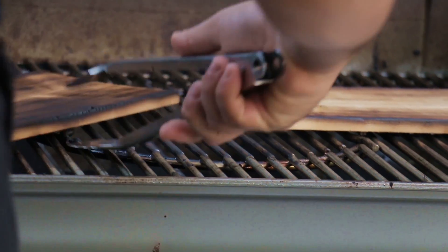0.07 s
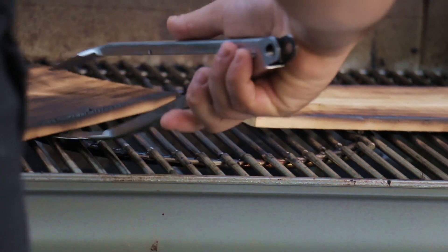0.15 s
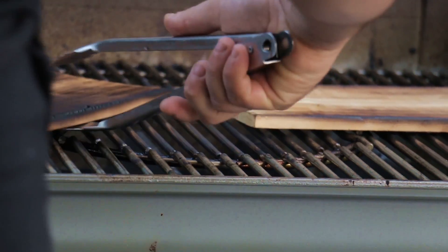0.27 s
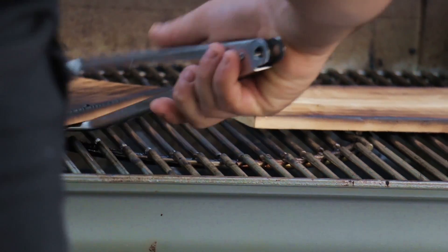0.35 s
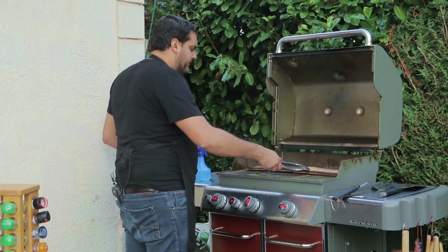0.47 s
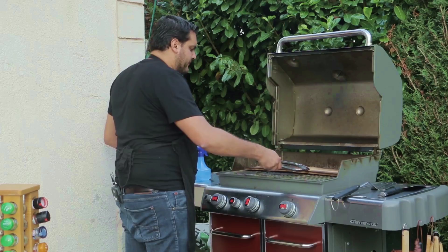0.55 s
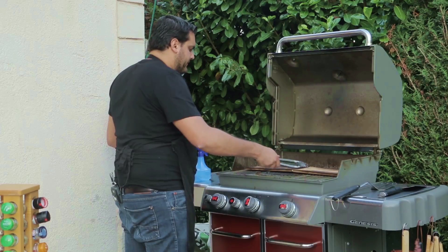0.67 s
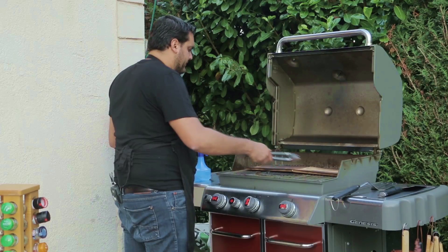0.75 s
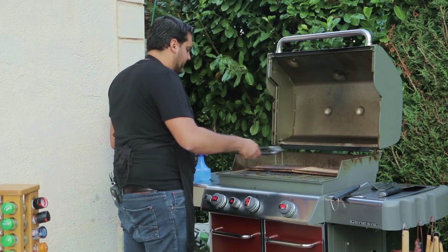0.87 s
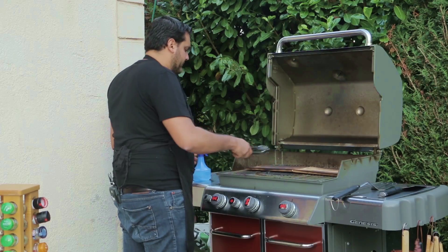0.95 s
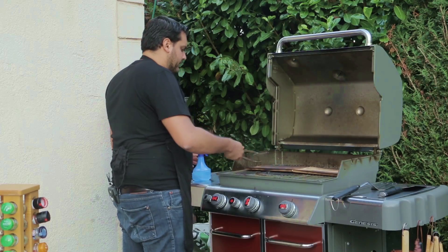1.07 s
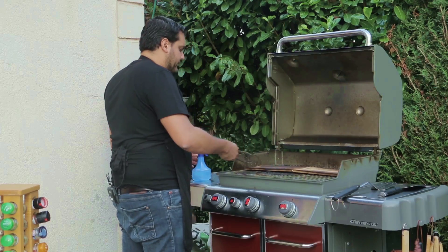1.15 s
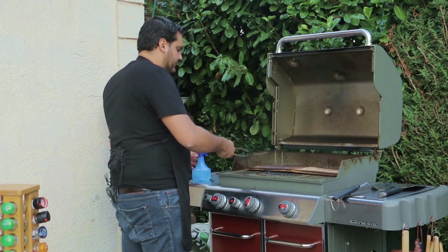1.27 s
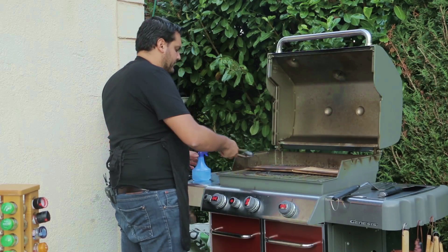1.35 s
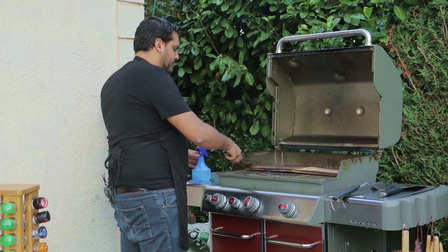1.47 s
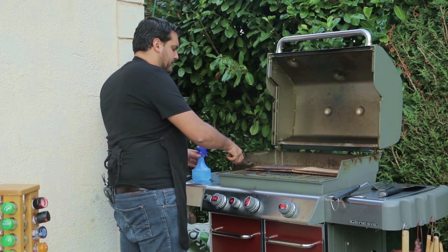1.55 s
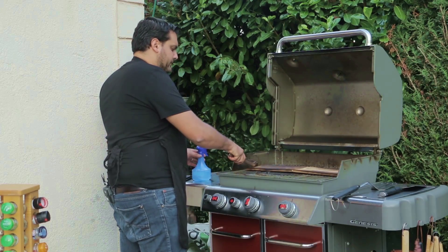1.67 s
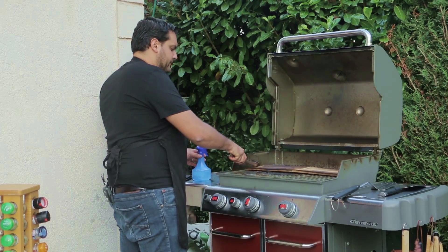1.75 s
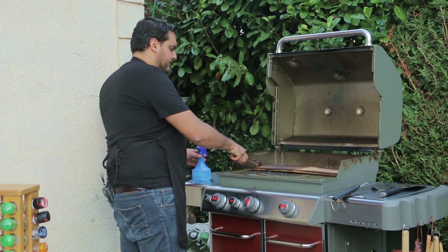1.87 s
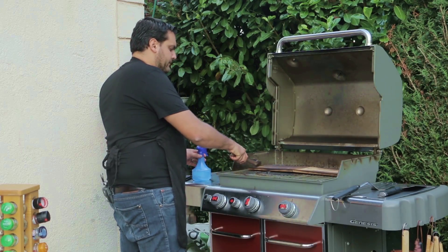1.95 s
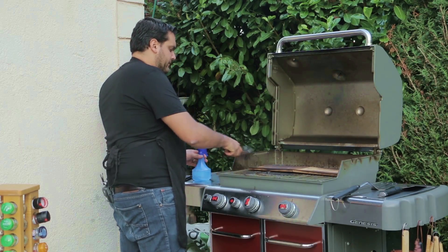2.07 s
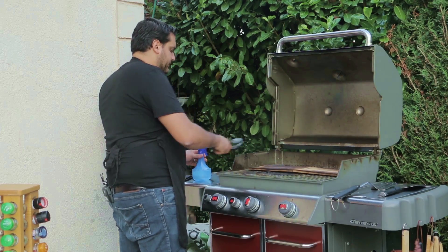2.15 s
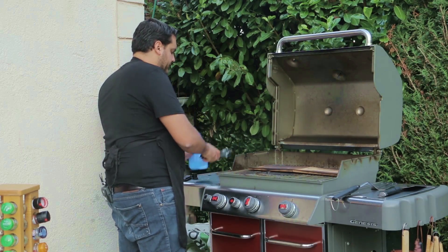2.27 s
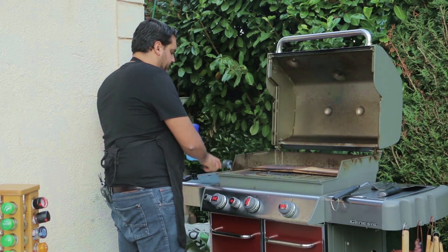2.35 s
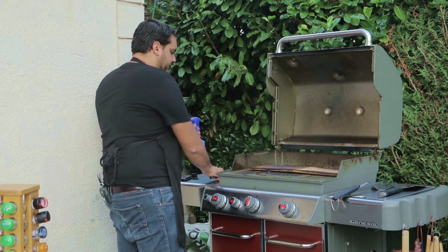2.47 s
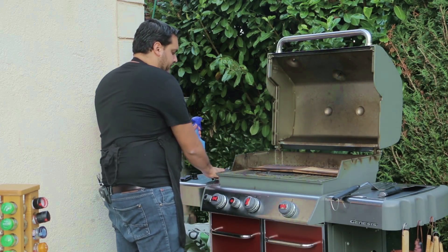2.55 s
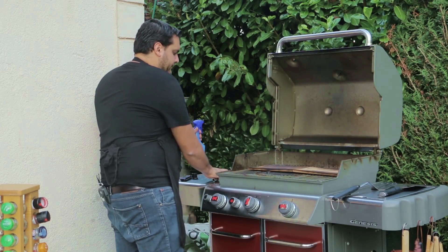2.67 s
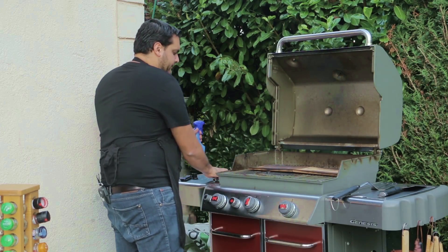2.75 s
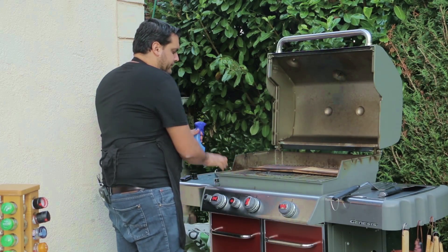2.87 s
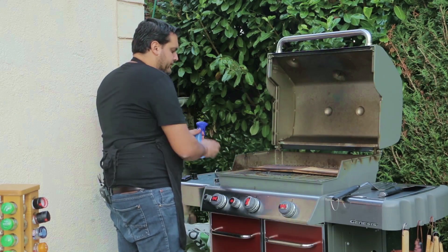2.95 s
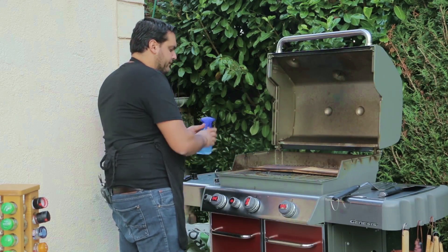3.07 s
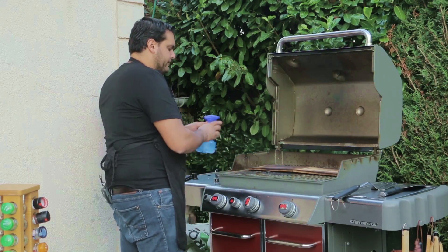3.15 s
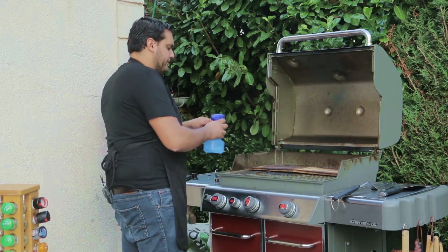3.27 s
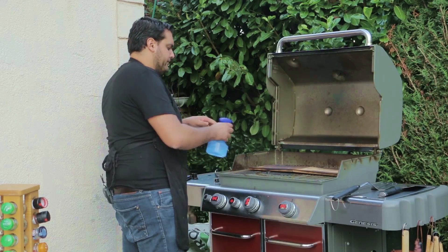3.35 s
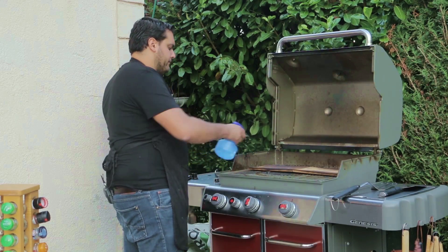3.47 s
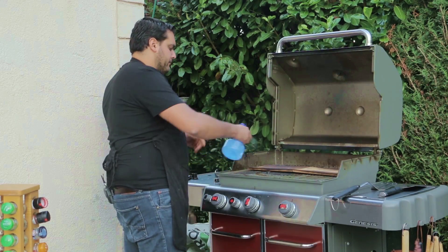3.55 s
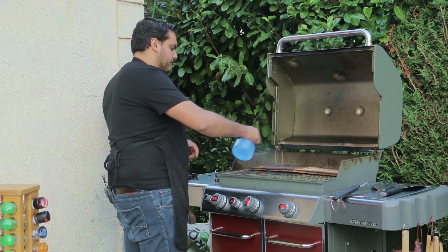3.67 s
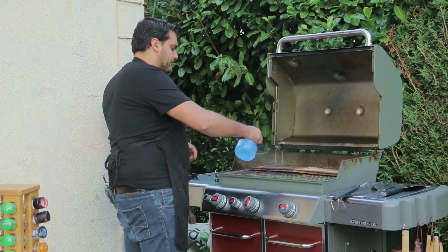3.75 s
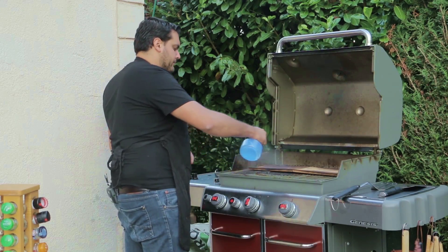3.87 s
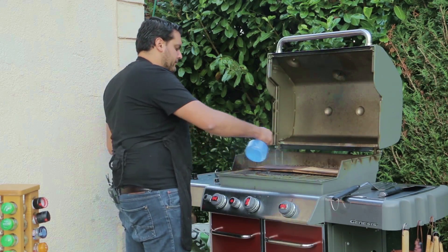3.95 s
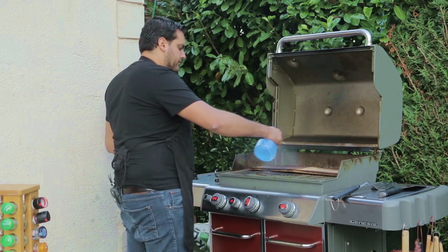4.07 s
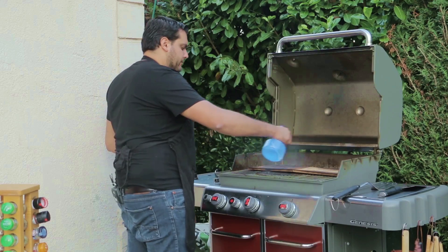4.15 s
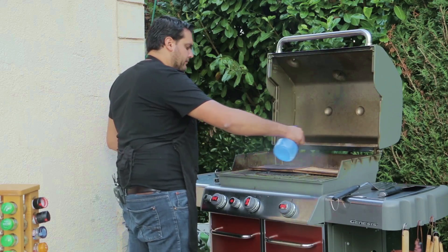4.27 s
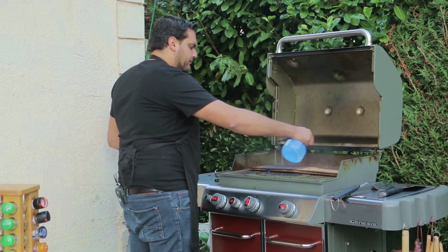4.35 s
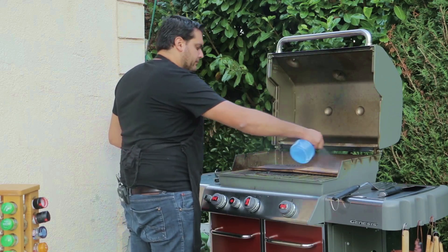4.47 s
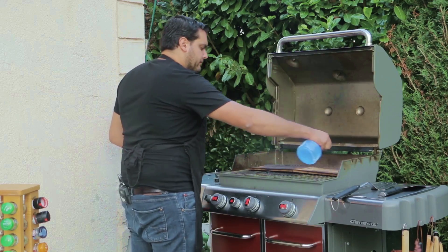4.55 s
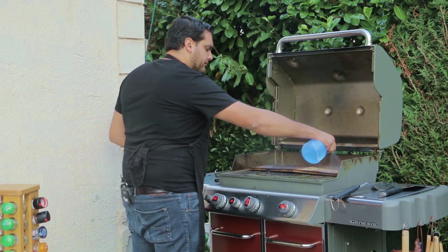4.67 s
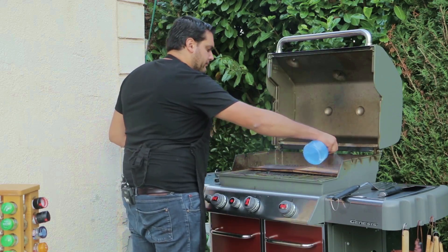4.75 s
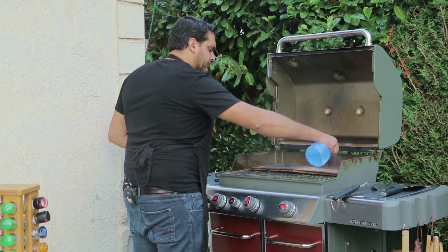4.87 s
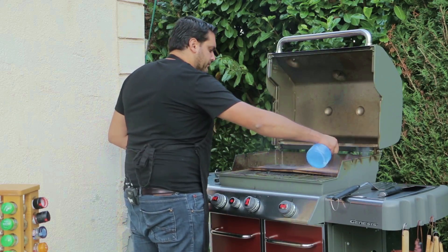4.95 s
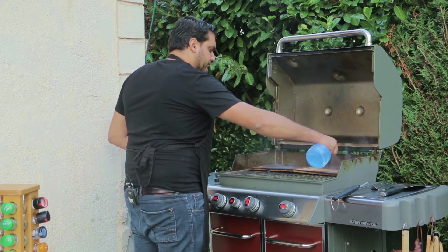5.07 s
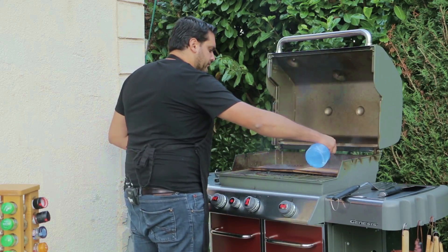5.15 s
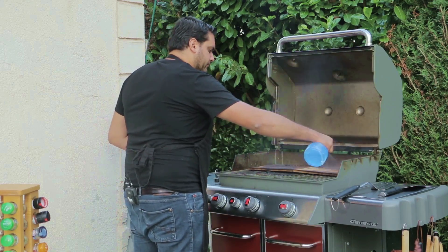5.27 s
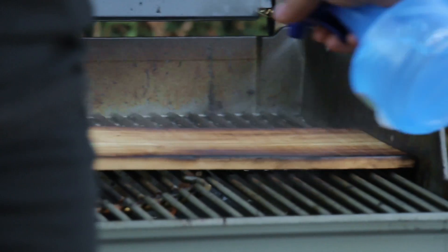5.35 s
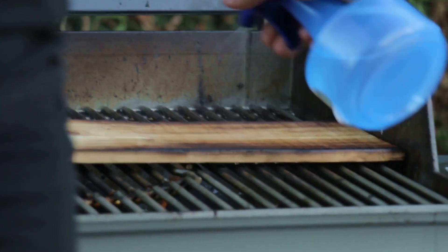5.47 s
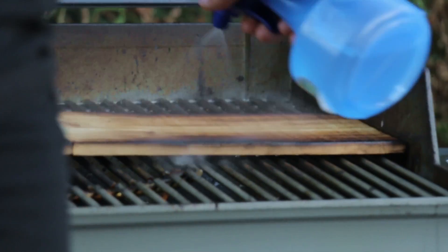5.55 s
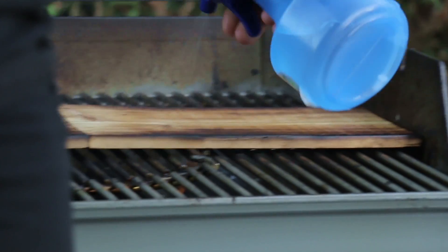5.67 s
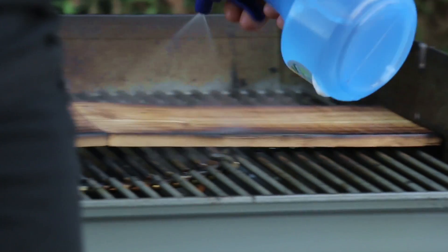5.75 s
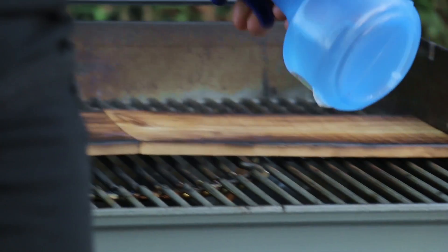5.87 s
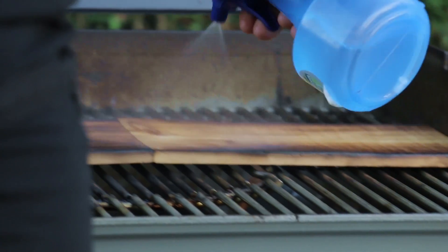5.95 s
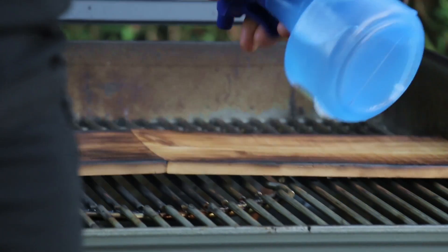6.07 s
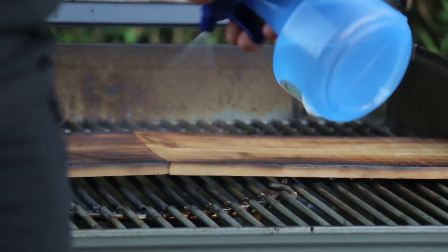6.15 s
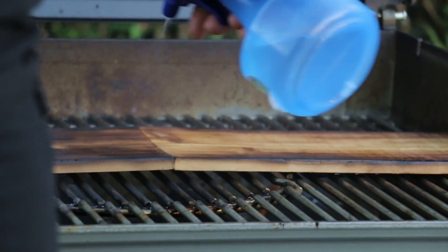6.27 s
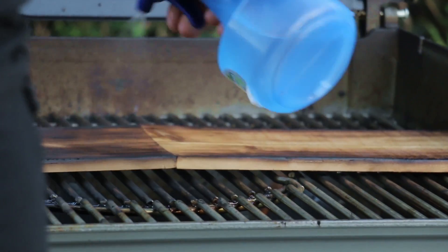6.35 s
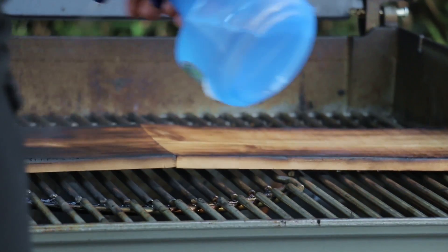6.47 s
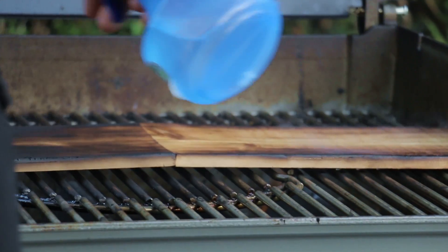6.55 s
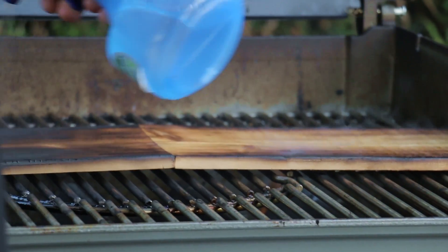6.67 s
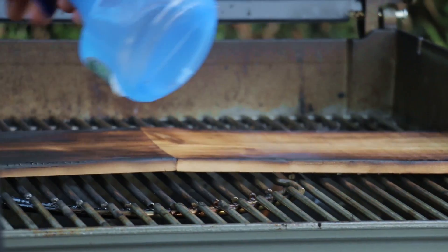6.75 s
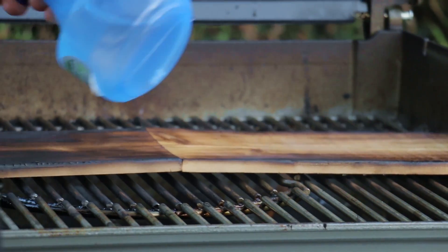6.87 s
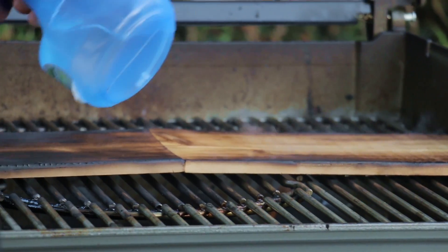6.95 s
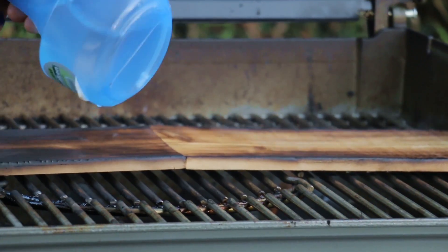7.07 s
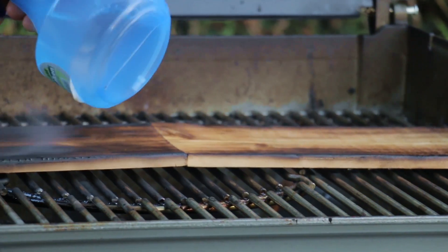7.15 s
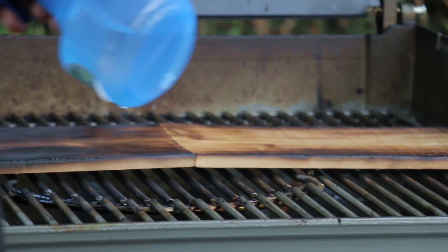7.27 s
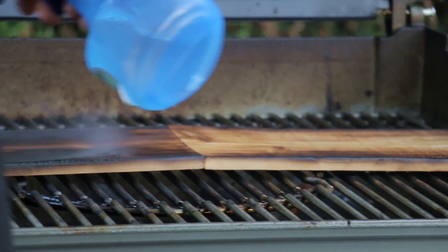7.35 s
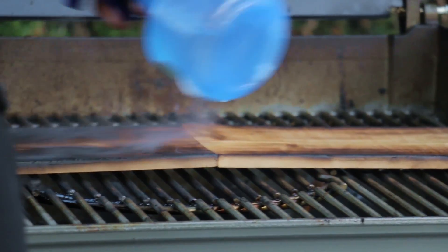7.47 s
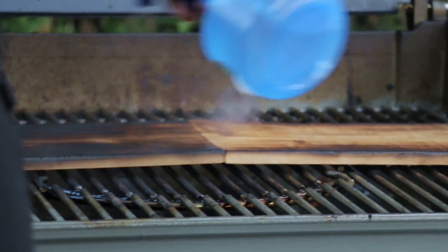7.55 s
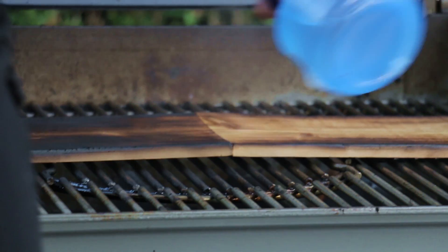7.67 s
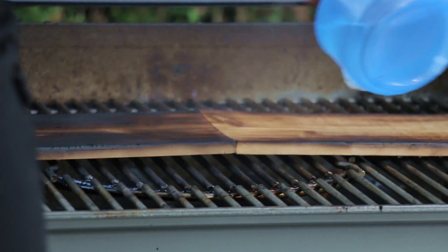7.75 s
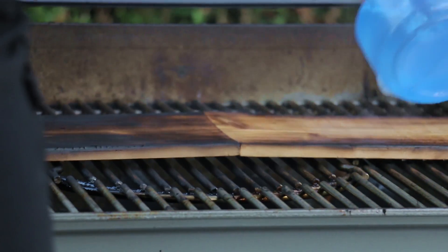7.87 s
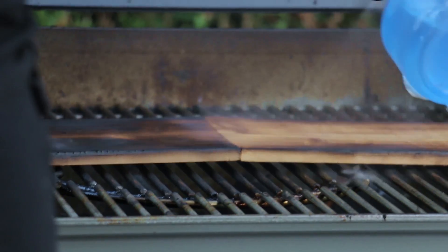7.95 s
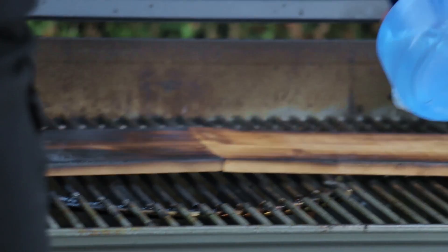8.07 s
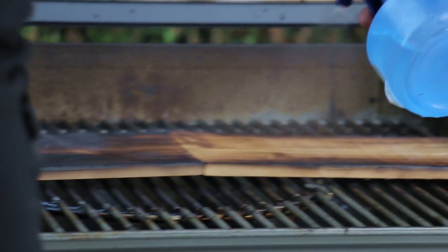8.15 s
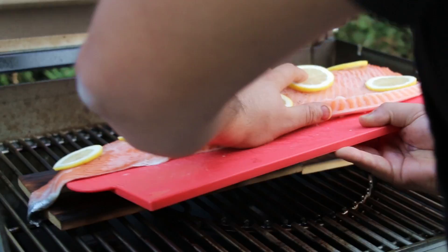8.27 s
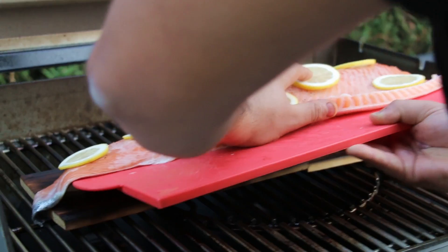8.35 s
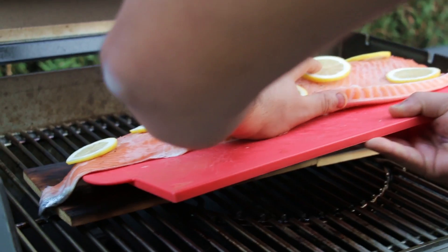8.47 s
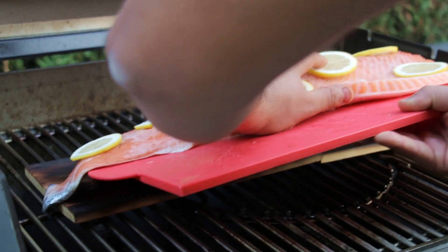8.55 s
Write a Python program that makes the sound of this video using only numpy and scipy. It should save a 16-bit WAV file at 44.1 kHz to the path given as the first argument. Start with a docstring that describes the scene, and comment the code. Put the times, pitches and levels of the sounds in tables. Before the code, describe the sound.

A close microphone beside an outdoor gas grill, with quiet low burner and garden murmur throughout. From 0 to 0.8 s planks knock on the bars, the strongest near 0.2 and 0.45 s, with gritty scraping and a dull, ringing cabinet. Softer knocks follow at about 1.0 and 1.7 s. Faint high hinge squeaks come between 1.0 and 1.6 s, then tong ticks and a clank around 1.5-1.7 s, and a sharp double tick at 2.35 s. Tongs hit the side shelf at 2.6, 2.7 and, loudest, 2.93 s, ringing away. Light handling and a plip lead into spraying from 3.6 s: about five pulls a second, each a plastic catch and short rushing jet, with pump plips and fine sizzling, strongest around 4-5 s. Stuttering lever creaks come at 3.9 s and grow prominent from 6.7 to 7.8 s. Pumping stops near 8 s; the remaining sizzle fades out by 8.6 s.

```python
"""Planks knock on a gas grill outdoors while steel tongs scrape, squeak and tick; the tongs then drop on the side shelf.
Blows ring damped modes and dense noise; rubbing is gritty noise; the hinge squeaks in unsteady tones.
A trigger bottle is then pumped about five times a second: its plastic lever creaks in stick-slip snaps,
the jet rushes, the pump plips and the mist sizzles on hot wood and bars, all as shaped noise and short tones.
Burners and garden murmur underneath; one close microphone; the sound fades out at the end."""
import sys
import numpy as np
from scipy import signal
from scipy.fft import rfft, irfft, next_fast_len
from scipy.io import wavfile
from scipy.ndimage import uniform_filter1d, map_coordinates

SR = 44100
rng = np.random.default_rng(int(sys.argv[2]) if len(sys.argv) > 2 else 0)


def dump(signal):
    """Clip the signal to [-1, 1] and save it as 16-bit WAV at the path in sys.argv[1]."""
    limited = np.clip(np.atleast_2d(signal).T, -1, 1)
    pcm = np.round(limited * 32767).astype(np.int16)
    wavfile.write(sys.argv[1], SR, pcm)


def voltage_ratio(level):
    """Linear amplitude factor for a level in decibels (scalar or array-like)."""
    return 10 ** (np.asarray(level, float) / 20)


N = 379319

# dense ringing of the grill: freq_hz, density_db_per_hz
GRILL_SPECTRUM = [(50, -34), (125, -8), (165, -22.5), (230, -5.5), (470, -1), (750, -2.5), (950, -7.5),
                  (3300, -16), (13800, -22), (16000, -32)]
# pulls of the trigger: start_s, jet_db, length_s, lever_catch_db
TRIGGER_PULLS = [(3.622, -42, 0.025, -34), (3.687, -47, 0.023, -29), (3.895, -39, 0.15, -46),
                 (4.106, -38, 0.023, -34.5), (4.311, -49.5, 0.051, -25.5), (4.528, -39, 0.04, -30),
                 (4.74, -41.5, 0.12, -24), (4.953, -36.5, 0.11, -43), (5.15, -41.5, 0.098, -39),
                 (5.348, -42.5, 0.039, -31), (5.56, -42, 0.039, -27), (5.773, -39.5, 0.061, -35),
                 (5.985, -42.5, 0.074, -28), (6.211, -44.5, 0.076, -27), (6.423, -45, 0.11, -27.5),
                 (6.653, -44.5, 0.14, -32.5), (6.875, -39.5, 0.14, -36), (7.093, -38.5, 0.14, -37),
                 (7.313, -39, 0.14, -28.5), (7.52, -40.5, .17, -31), (7.748, -40.5, 0.057, -39),
                 (7.963, -64, 0.024, -29)]


def unit(x):
    """Scaled to rms 1."""
    return x / np.sqrt(np.mean(x ** 2) + 1e-20)


def along(points, hz):
    """(Hz, value) points interpolated on a log frequency axis."""
    f, v = np.transpose(points)
    return np.interp(np.log(hz + 1), np.log(f + 1), v)


def wobble(rate_hz):
    """A smooth random curve with rate_hz knots a second."""
    knots = rng.standard_normal(int(N * rate_hz / SR) + 4)
    return map_coordinates(knots, [np.arange(N) * rate_hz / SR])


def filtered(x, response):
    """x through a complex response of frequency."""
    m = next_fast_len(len(x) + 8192)
    return irfft(rfft(x, m) * response(np.fft.rfftfreq(m, 1 / SR)), m)[:len(x)]


def rush(spectrum, patchy_db, grain):
    """Coloured noise of rms 1 with patches of random gain; grain makes single samples stand out."""
    spiky = rng.standard_normal(N) * np.exp(grain * rng.standard_normal(N))
    z = signal.stft(spiky, nperseg=512)[2]
    field = uniform_filter1d(rng.standard_normal(z.shape), 6, 0)
    field = uniform_filter1d(field, 8, 1)
    patched = signal.istft(z * voltage_ratio(patchy_db * unit(field)), nperseg=512)[1][:N]
    return unit(filtered(patched, lambda hz: voltage_ratio(along(spectrum, hz))))


def murmur():
    """Gas flames and the far garden: coloured noise, slowly breathing."""
    # freq_hz, density_db_per_hz
    murmur_spectrum = [(25, -5), (60, 14), (123, 2), (560, 0.5), (1160, -9), (2600, -22), (5500, -27),
                       (8000, -43), (11000, -36), (16000, -46.5)]
    breath_db = .6 * wobble(1.5) + .5 * wobble(9)
    return voltage_ratio(-53.0 + breath_db) * rush(murmur_spectrum, patchy_db=1.5, grain=0.21)


def rubbing():
    """Gritty friction of tongs, planks and hands: a bright rasp and the dull answer of the cabinet."""
    # bright rasp: freq_hz, density_db_per_hz
    rasp_spectrum = [(700, -32.5), (1300, -4.5), (2400, -13.5), (16000, -20)]
    # start_s, strongest_s, end_s, level_db, dull_re_bright_db
    rubs = [(-.3, 0.115, 0.31, -47.5, 9), (0.145, 0.29, 0.54, -49.5, 5.5), (.45, 0.516, .9, -56.5, 0.5),
            (1.9, 2.325, 2.66, -57.5, -3), (2.715, 2.923, 2.93, -37.5, 3.5), (3.239, 3.285, 3.33, -61, 7),
            (3.327, 3.375, 4, -67.5, 12), (3.442, 3.594, 4.1, -60, -15)]
    rasp = rush(rasp_spectrum, patchy_db=6.5, grain=0.8)
    dull = rush(GRILL_SPECTRUM, patchy_db=3.5, grain=0.69)
    out, t = np.zeros(N), np.arange(N) / SR
    for start_s, strongest_s, end_s, level_db, dull_db in rubs:
        pressure = np.interp(t, [start_s, strongest_s, end_s], [0, 1, 0]) ** 2.02
        out += voltage_ratio(level_db) * pressure * (rasp + voltage_ratio(dull_db) * dull)
    return out


def squeaks():
    """Stick-slip tones of the hinge, rough and unsteady in pitch."""
    # start_s, length_s, first_hz, last_hz, level_db
    hinge_squeaks = [(1, 0.094, 5700, 5480, -63), (1.261, 0.11, 3460, 3780, -57.5),
                     (1.282, 0.085, 3880, 4200, -58), (1.497, .125, 11700, 12050, -65),
                     (1.368, 0.11, 3980, 4220, -56), (1.469, .15, 4130, 4240, -57)]
    rise_share, edge_db = 0.26, -7  # share of the length spent rising; both ends re top
    out, t = np.zeros(N), np.arange(N) / SR
    for start_s, length_s, first_hz, last_hz, level_db in hinge_squeaks:
        glide_hz = np.interp(t - start_s, [0, length_s], [first_hz, last_hz])
        shape_db = np.interp((t - start_s) / length_s, [0, rise_share, 1], [edge_db, 0, edge_db],
                             left=-150, right=-150)
        rough_db = 3 * wobble(150) + 2 * wobble(35)
        phase = 2 * np.pi * np.cumsum(glide_hz + 130 * wobble(900)) / SR
        out += voltage_ratio(level_db + shape_db + rough_db) * np.sin(phase)
    return out


def plips():
    """Bubbles and valve pops in the pump, and small snaps and knocks of the lever: a short tone that rises as
    it dies."""
    # start_s, level_db, pitch_hz
    plip_tones = [(3.453, -44.5, 1920), (3.861, -33, 2090), (4.719, -34, 2220), (4.91, -40, 1720),
                  (5.137, -37, 2280), (5.499, -38, 3350), (5.995, -40, 770), (6.345, -41, 1900),
                  (6.43, -37, 800), (6.63, -44, 2230)]
    out, t = np.zeros(N + SR), np.arange(SR // 25) / SR
    for start_s, level_db, pitch_hz in plip_tones:
        t60_s = 55 / pitch_hz
        tone = np.sin(2 * np.pi * pitch_hz * t * (1 + 4 * t))
        out[round(start_s * SR):][:len(t)] += voltage_ratio(level_db - 60 * t / t60_s) * tone
    return out[:N]


def jet_flow():
    """Flow of the jet: each pull starts quickly and stops quickly."""
    t, flow = np.arange(N) / SR, np.zeros(N)
    for start_s, jet_db, length_s, _ in TRIGGER_PULLS:
        knots_s = [0, .004, 0.53 * length_s, length_s, length_s + 0.0099]
        flow += voltage_ratio(jet_db) * np.interp(t - start_s, knots_s, [0.0014, 0.82, 1.0, 0.59, 0.0008])
    return flow


def spray():
    """Droplets flash to steam in a fine sizzle; the jet adds turbulent noise that follows its flow."""
    # steam: freq_hz, density_db_per_hz
    sizzle_spectrum = [(250, -13.5), (500, -11.5), (2500, -10), (7500, -7.5), (12300, -0.5), (15700, -4.5),
                       (16200, -46)]
    # jet: freq_hz, density_db_per_hz
    jet_spectrum = [(200, -10.5), (400, -10.5), (650, -6.5), (820, -2.5), (1100, -8.5), (2000, -3),
                    (6000, -6.5), (7500, -9), (16000, -18)]
    # lasting sizzle: time_s, level_db
    wetness = [(3.72, -42), (3.78, -37), (4.02, -34.5), (4.4, -34), (4.93, -38.5), (5.02, -35), (5.11, -41),
               (5.75, -40), (6.6, -46), (6.85, -46.5), (7.25, -39), (7.9, -40.5), (8.3, -53), (8.6, -54)]
    flash_db, landing_s = -2, 0.075  # fresh mist re jet; spread of its landing
    flow = jet_flow()
    landing = np.hanning(round(landing_s * SR))
    fresh = np.abs(signal.fftconvolve(flow, landing / landing.sum())[:N])
    lasting = voltage_ratio(np.interp(np.arange(N) / SR, *np.transpose(wetness), left=-150))
    strength = np.hypot(lasting, voltage_ratio(flash_db) * fresh) * voltage_ratio(0.7 * wobble(30))
    sizzle = strength * rush(sizzle_spectrum, patchy_db=1.5, grain=0.24)
    jet = flow * voltage_ratio(wobble(70)) * rush(jet_spectrum, patchy_db=2.5, grain=0.5)
    return sizzle + jet


def slips():
    """(time_s, level_db, brightness_db) per slip: a catch each pull, and runs with settling gaps and arcing strength."""
    # first_slip_s, slips, settled_gap_s, level_db, strongest_share_of_run, brightness_db
    chatter = [(3.897, 5, .0245, -18, .5, 0), (5.781, 2, .02, -25, .5, 0), (6.666, 7, .0268, -18, .45, 2),
               (6.895, 6, .0245, -19, .42, 1), (7.103, 6, .025, -18, .65, 3),
               (7.341, 5, .0245, -20, .45, -2), (7.545, 2, .026, -26, .5, -5),
               (7.588, 4, .026, -19, .25, -6), (7.777, 2, .028, -24, .5, -6)]
    catch_s, arc_db = .001, 42  # lever catches just after the pull starts; swell and fade of a run
    gap_short, gap_settles = .45, .35  # share the first gap lacks; what is left of that lack each next gap
    rows = [(start_s + catch_s, catch_db, 0) for start_s, _, _, catch_db in TRIGGER_PULLS]
    for first_s, number, gap_s, level_db, strongest, bright_db in chatter:
        k = np.arange(round(number))
        gaps_s = gap_s * (1 - gap_short * gap_settles ** (k - 1.)) * (k > 0)
        times_s = first_s + np.cumsum(gaps_s)
        levels_db = level_db - arc_db * ((k + .5) / len(k) - strongest) ** 2
        rows += zip(times_s, levels_db, [bright_db] * len(k))
    return rows


def shell(modes):
    """Response of the bottle shell: resonances in parallel with alternating signs."""
    def response(f):
        total = 0
        for k, (centre_hz, width_hz, db) in enumerate(modes):
            resonance = 1j * f * width_hz / (centre_hz ** 2 - f * f + 1j * f * width_hz)
            total = total + (-1) ** k * voltage_ratio(db) * resonance
        return total
    return response


def creaks():
    """Each slip of the lever is a snap with a short buzz and a rebound, coloured by the hollow bottle."""
    # centre_hz, width_hz, gain_db
    bottle_modes = [(370, 114, 5.5), (800, 94, 7), (2020, 1270, 2.5), (4240, 1000, 3), (5510, 850, 3),
                    (12230, 5100, -4)]
    low, high = np.zeros((2, N + SR))
    t = np.arange(SR // 25) / SR
    for time_s, level_db, bright_db in slips():
        rebound = voltage_ratio(-10.5 - 60 * abs(t - .008) / 0.035)
        buzz = voltage_ratio(-60 * t / 0.016) + rebound
        slip = 0.27 * buzz * rng.standard_normal(len(t))
        slip[0] += 1.05  # snap
        i = round(time_s * SR)
        low[i:][:len(t)] += voltage_ratio(level_db + 7.5 - .5 * bright_db) * slip
        high[i:][:len(t)] += voltage_ratio(level_db + 7.5 + .5 * bright_db) * slip
    return filtered(low[:N], shell(bottle_modes[:3])) - filtered(high[:N], shell(bottle_modes[3:]))


def contacts():
    """Every blow: (start_s, level_db, boom_db, treble_db, contact_s, ring_out_factor, tongs_db)."""
    # planks on the bars: start_s, level_db, hardness_db (treble), contact_s, ring_out_factor
    knocks = [(0.001, -33.5, -37, 0.017, 0.64), (0.098, -28.5, -7, 0.005, 0.57),
              (0.2019, -17, -12, 0.017, 0.32), (0.2342, -28.5, -17.5, 0.0074, 1.7),
              (0.4553, -23, -11.5, 0.0036, 0.75), (0.5143, -31, -22.5, 0.0038, 1.45),
              (0.7565, -29.5, -35.5, 0.0032, 0.76), (0.7963, -35.5, -22, 0.018, 1.5),
              (1.001, -37.5, -36, 0.004, 0.12), (1.728, -43, -49, 0.0052, 0.86)]
    # loose tongs on a bar: start_s, level_db, contact_s
    clanks = [(1.625, -34.5, 0.0073)]
    # tips of the gripped tongs on steel: start_s, level_db, treble_db, contact_s
    ticks = [(1.5189, -36, -5, 0.006), (1.6933, -28.5, -4.5, 0.01), (2.318, -44, 4, 0.0092),
             (2.349, -18.5, -3, 0.0073), (2.3628, -25, 2, 0.013)]
    # tongs on the side shelf: start_s, level_db, treble_db, contact_s
    drops = [(2.594, -14.5, -14.5, 0.019), (2.7209, -15, -13, 0.024), (2.933, -9, -11, 0.061)]
    # softer knocks boom more, harder ones ring the tongs more
    rows = [(s, db, -12 - 0.36 * hard_db, hard_db, contact_s, factor, -2.5 + 0.68 * hard_db)
            for s, db, hard_db, contact_s, factor in knocks]
    rows += [(s, db, -4, -6, contact_s, 1.75, 9) for s, db, contact_s in clanks]
    # the grip damps everything
    rows += [(s, db, -18.5, treble_db, contact_s, 0.15, -14) for s, db, treble_db, contact_s in ticks]
    rows += [(s, db, -5.5, treble_db, contact_s, 0.89, -16) for s, db, treble_db, contact_s in drops]
    return rows


def ring(modes, t, factor, blur):
    """Damped modes at new strengths for every blow; loose joints let the phase wander."""
    hz, db, t60_s = np.transpose(modes)[:, :, None]
    luck_db = 2.5 * rng.standard_normal((len(modes), 1))
    wander = blur * np.cumsum(rng.standard_normal((len(modes), len(t))), axis=1)
    decay = voltage_ratio(db + luck_db - 60 * t / (factor * t60_s))
    return np.sum(decay * np.sin(2 * np.pi * hz * t + wander), axis=0)


def dense_ringing(t, thicket, boom_db, treble_db, factor):
    """Many small grill modes as noise that dies at its own rate in each band."""
    # freq_hz, t60_s
    grill_decay = [(150, 0.54), (600, 0.62), (2000, 0.48), (5000, 0.28), (12000, 0.12)]
    noise = unit(irfft(thicket * rfft(rng.standard_normal(SR))))
    hz, frames_s, z = signal.stft(noise, SR, nperseg=128)
    t60_s = factor * along(grill_decay, hz)[:, None]
    dying = signal.istft(z * voltage_ratio(-60 * frames_s / t60_s), SR, nperseg=128)[1][:SR]
    # (Hz, dB): where and how hard the blow lands
    tilt = [(600, boom_db + 5), (1400, 0.0044), (2200, 0.0095),
            (4500, 0.5 * (treble_db + 14.5)), (8000, treble_db + 12.0)]
    coloured = filtered(dying, lambda f: voltage_ratio(along(GRILL_SPECTRUM, f) + along(tilt, f)))
    rise_s = .0002 * voltage_ratio(-treble_db / 2)  # soft blows set in gently
    return coloured * np.sin(np.pi / 2 * np.minimum(1, t / rise_s)) ** 2


def blows():
    """Each contact rattles for a moment and sets cabinet, bars and tongs ringing."""
    # sheet steel and bars: freq_hz, level_db, t60_s
    cabinet_modes = [(226, -10, .4), (254, -6, .38), (366, -8, .45), (462, -6, .35), (556, 0, .4),
                     (727, -5, .35), (1075, -12, .3), (1200, -12, .35), (1508, -11, .35), (2980, -28, .4)]
    # freq_hz, level_db, t60_s
    tongs_modes = [(1518, -18, 1.3), (1630, -7, .07), (2100, 1, .17), (2309, -20, .75), (2880, -21, 1),
                   (3430, 2, .07), (3892, -24, .6), (4530, -20, .5), (5190, -25, .6), (6790, -9, .12),
                   (7560, -17, .3), (11160, -25, .35), (12130, -19, .35)]
    out, t = np.zeros(N + SR), np.arange(SR) / SR
    # panels and bars hold a small mode every 9 Hz or so
    thicket = .35 + (rng.random(SR // 2 + 1) < 1 / 9)
    for start_s, level_db, boom_db, treble_db, contact_s, factor, tongs_db in contacts():
        dense = dense_ringing(t, thicket, boom_db, treble_db, factor)
        touch_s = t[:round(SR * 3 * contact_s)]
        rattle = rng.standard_normal(len(touch_s)) ** 3 * np.exp(-touch_s / contact_s)
        rattle[0] = 0.54 * np.linalg.norm(rattle)  # strong first touch
        clatter = 6 * np.std(dense) * unit(signal.fftconvolve(dense, rattle)[:SR])
        build_up = 1 - np.exp(-t / (0.16 * contact_s))
        boom = voltage_ratio(boom_db - .4) * build_up * ring(cabinet_modes, t, factor, blur=.02)
        clink = voltage_ratio(tongs_db) * np.minimum(1, t / .005) * ring(tongs_modes, t, min(factor, 1), blur=.022)
        out[round(start_s * SR):][:SR] += voltage_ratio(level_db - 6) * (clatter + boom + clink)
    return out[:N]


def scene():
    """All sources reach one microphone, alike in both channels, and fade out."""
    # start_s, end_s
    fade_out = (8.205, 8.608)
    mono = murmur() + rubbing() + squeaks() + plips() + spray() + creaks() + blows()
    return np.interp(np.arange(N) / SR, fade_out, [1, 0]) * np.array([mono, mono])


def low_pass(x):
    """Removes everything above the highest recorded frequency."""
    return signal.sosfilt(signal.butter(12, 15900, fs=SR, output="sos"), x)


def record(dry):
    """The microphone drops the deep bass below about 130 Hz."""
    low_cut = signal.butter(3, 130, "high", fs=SR, output="sos")
    mix = signal.sosfilt(low_cut, dry)
    return low_pass(mix)


dry = scene()
out = record(dry)
dump(out)
```